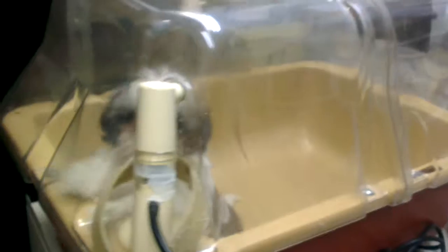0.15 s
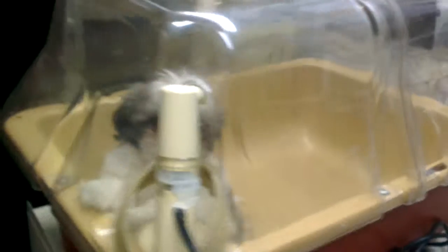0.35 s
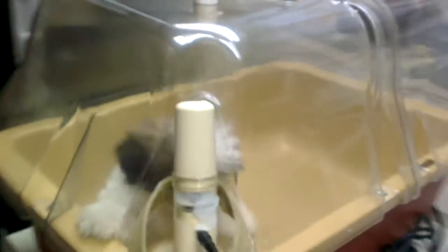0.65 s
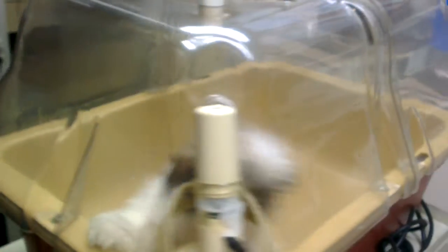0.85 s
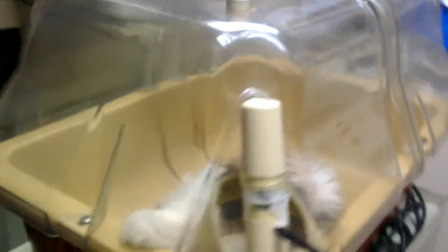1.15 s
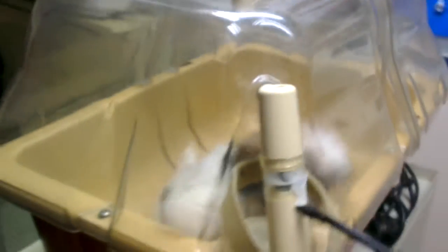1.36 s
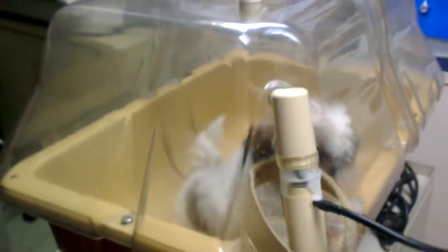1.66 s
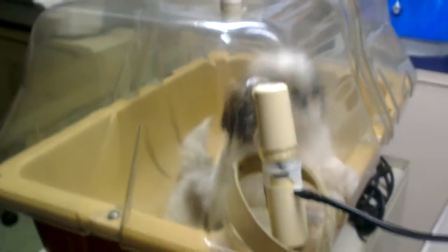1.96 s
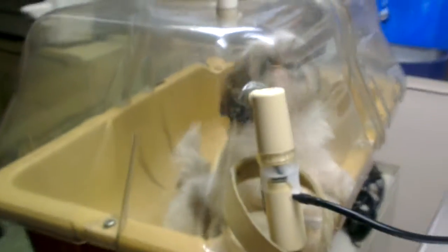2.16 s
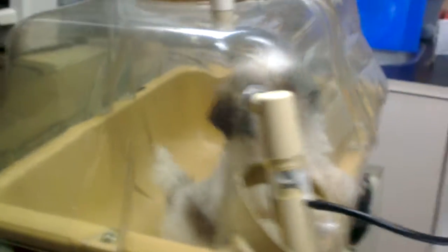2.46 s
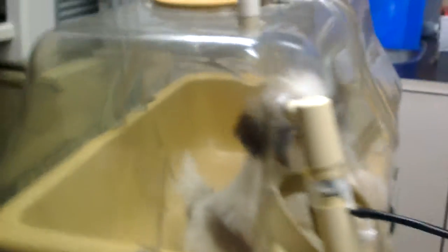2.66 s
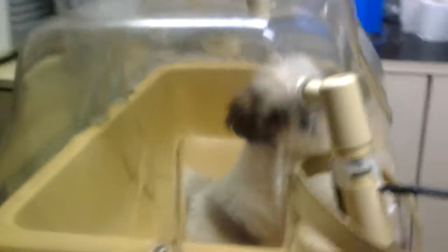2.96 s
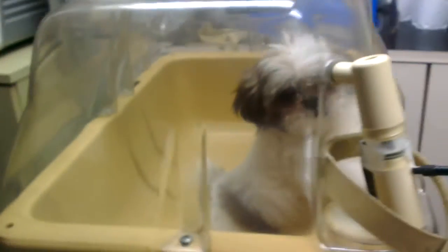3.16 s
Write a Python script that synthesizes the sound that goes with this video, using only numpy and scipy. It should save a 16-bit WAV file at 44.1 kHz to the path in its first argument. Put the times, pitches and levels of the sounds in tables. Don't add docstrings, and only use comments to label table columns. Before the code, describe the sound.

A compressor nebulizer hisses and hums steadily up close in a small room.

```python
import sys
import numpy as np
from scipy import signal
from scipy.fft import rfft, irfft
from scipy.io import wavfile
from scipy.ndimage import uniform_filter1d, map_coordinates

SR = 44100
rng = np.random.default_rng(int(sys.argv[2]) if len(sys.argv) > 2 else 0)


def put_to_file(sound):
    columns = np.atleast_2d(sound).T
    safe = np.clip(columns, -1, 1)
    whole_steps = np.round(safe * 32767)
    wavfile.write(sys.argv[1], SR, whole_steps.astype(np.int16))


def natural_amplitude(level_db):
    exponent = np.asarray(level_db, float) / 20
    return 10 ** exponent


N = 145089


def unit(x):
    return x / np.sqrt(np.mean(x ** 2) + 1e-20)


def along(points, hz):
    f, v = np.transpose(points)
    return np.interp(np.log(hz + 1), np.log(f + 1), v)


def curves(rows, t):
    s, *columns = np.transpose(rows)
    return [np.interp(t, s, column) for column in columns]


def wobble(rate):
    coarse = np.arange(0, N + 32, 32)
    knots = rng.standard_normal(2000)
    return np.interp(np.arange(N), coarse, map_coordinates(knots, [coarse * rate / SR]))


def peak(hz, centre_hz, width_hz):
    return 1 / (1 + (2 * (hz - centre_hz) / width_hz) ** 2)


def rush(gain, patchy_db, drive=1):
    # (frequency [Hz], correlation [0-1])
    alike = [(300, 0.5), (900, 0.31), (1700, 0), (3000, 0.26), (5000, 0.33), (8000, 0.98), (11000, 0.65),
             (15000, 0.5)]
    hz, t, z = signal.stft(drive * rng.standard_normal((2, N)), SR, nperseg=2048, noverlap=1536)
    hz = hz[:, None]
    patches = uniform_filter1d(rng.standard_normal(z.shape), 15, 1)
    patches = unit(uniform_filter1d(patches, 5, 2))
    spread = np.arccos(np.clip(along(alike, hz), -1, 1)) / 2
    mid = z[0] * np.cos(spread)
    side = z[1] * np.sin(spread)
    shaped = np.array([mid + side, mid - side]) * gain(hz, t) * natural_amplitude(patchy_db * patches)
    return unit(signal.istft(shaped, SR, nperseg=2048, noverlap=1536)[1][:, :N])


def room():
    # (frequency [Hz], level [dB per Hz])
    diffuse_tone = [(59, -75), (100, -48), (352, -10.5), (541, -16.5), (1160, -10.5), (1760, -19),
                    (2660, -12), (3840, -11.5), (4500, -11), (5850, -42), (9900, -120)]
    diffuse = rush(lambda hz, t: natural_amplitude(along(diffuse_tone, hz)), 1.7)
    tube = rush(lambda hz, t: peak(hz, 2626, 147), 2.1)
    tube_level = natural_amplitude(-51.5 + 0.3 * wobble(3.1))
    return natural_amplitude(-47) * diffuse * natural_amplitude([[.7], [-.7]]) + tube_level * tube * natural_amplitude([[1.4], [-1.4]])


def dog():
    # (time [s], pitch [Hz], level [dB])
    whimper_line = [
        (1.73, 805, -80),
        (1.76, 815, -58),
        (1.84, 855, -57),
        (1.865, 895, -62),
        (1.92, 905, -60),
        (1.96, 890, -67),
        (2.1, 900, -70),
    ]
    # (time [s], level [dB], length [s])
    scuff_marks = [
        (1.713, -46, 0.015),
        (1.759, -45.5, 0.044),
        (3.032, -59, 0.079),
    ]
    t = np.arange(N) / SR
    hz, level_db = curves(whimper_line, t)
    phase = 2 * np.pi * np.cumsum(hz * (1 + .01 * wobble(60))) / SR
    voice = np.sin(phase) + .15 * np.sin(2 * phase)
    whimper = natural_amplitude(level_db + 5 + 1.5 * wobble(35)) * voice * (t > 1.7) * (t < 2.1)
    shape = sum(natural_amplitude(db) * np.exp(-((t - s) / length) ** 2) for s, db, length in scuff_marks)
    rub = rush(lambda f, s: peak(f, 2160, 2000), 2.3, natural_amplitude(3.3 * wobble(300)))
    return whimper + shape * rub


def pump():
    # (multiple of stroke rate, level [dB])
    near_orders = [(1, -60), (2, -54), (3, -51), (4, -19), (5, -10.5), (6, -8), (7, -6), (8, 0.5),
                   (9, -11.5), (10, -1), (11, -8.5), (12, -23), (13, -17), (14, -18), (15, -15), (16, -17),
                   (17, -23), (18, -24.5), (19, -18.5), (20, -13), (21, -40), (22, -42), (23, -53),
                   (24, -36), (25, -16), (26, -22), (27, -15), (28, -16)]
    # (multiple of stroke rate, level [dB])
    far_orders = [(1, -62), (2, -64), (3, -30), (4, -16.5), (5, -22), (6, -17), (7, 0), (8, 0.5), (9, -8),
                  (10, -11.5), (11, -15), (12, -26), (13, -18), (14, -20.5), (15, -14.5), (16, -9),
                  (17, -20.5), (18, -10), (19, -12.5), (20, -12), (21, -25), (22, -57), (23, -64),
                  (24, -77), (25, -12.5), (26, -13), (27, -13.5), (28, -27)]
    # (multiple of stroke rate, level [dB])
    blades = [(41, -64.5), (43, -83.5)]
    # (time [s], level [dB], nearness [0-1])
    pump_walk = [
        (.08, -46, 0.95),
        (.5, -49.5, 0.97),
        (.9, -52, 0.85),
        (1.3, -52.5, 0.5),
        (1.6, -54, .05),
        (2.3, -55, 0),
        (3.29, -55, 0.45),
    ]
    # (frequency [Hz], level [dB per Hz])
    rattle_tone = [(59, -74), (100, -25), (207, -14), (356, -8), (464, 4), (548, -15), (900, -6),
                   (1170, -37), (1980, -120)]
    stroke_hz, unsteady_db = 45.3, 0.8
    t = np.arange(N) / SR
    level_db, near = curves(pump_walk, t)
    near = np.clip(near, 0, 1)
    stroke = 2 * np.pi * (stroke_hz * t + 0.0024 * wobble(3.08))
    hum = 0
    for (k, near_db), (_, far_db) in zip(near_orders, far_orders):
        phase = rng.uniform(0, 2 * np.pi) + np.array([[.15], [-.15]]) * wobble(1.75)
        order_db = near * near_db + (1 - near) * far_db + unsteady_db * k / 7 * wobble(8.93)
        hum = hum + natural_amplitude(order_db) * np.sin(k * stroke + phase)
    whine = sum(natural_amplitude(db - 0.5 + 0.83 * wobble(3.62)) * np.sin(k * stroke) for k, db in blades)
    rattle = rush(lambda hz, s: natural_amplitude(along(rattle_tone, hz)), 1.5, 1 + 0.73 * np.sin(stroke))
    case = hum + natural_amplitude(-10) * near * rattle
    return (natural_amplitude(level_db) * case + whine) * natural_amplitude([[.6], [-.6]])


def walls(hz, t):
    echo_db, echo_s, ears_s, drift_s = -7, .011, 0.000819, .00008
    delay = echo_s * rng.uniform(0.03026, 1, (6, 1, 1, 1))
    delay = delay + ears_s * rng.uniform(-0.493, 0.4996, (6, 2, 1, 1))
    knots = rng.standard_normal((12, 8))
    drift = np.array([np.interp(t, np.linspace(0, N / SR, 8), k) for k in knots]).reshape(6, 2, 1, -1)
    echoes = sum(np.exp(-2j * np.pi * hz * (d + drift_s * m)) for d, m in zip(delay, drift))
    return 1 + natural_amplitude(echo_db) * echoes


def jet():
    # (time [s], nearness [dB], aim of the beam [dB], bearing left over right [dB])
    path = [(0.09, -31, 2.5, -2.5), (0.16, -31.5, 7.5, -2.5), (0.6, -31, 8, -2.5), (0.91, -31.5, 11, -4),
            (0.93, -33, 11.5, -7.5), (1.26, -36.5, 17, -8.5), (1.64, -36.5, 11, -9.5),
            (2.31, -40.5, 8.5, -5.5), (2.55, -41, 9, -6.5), (2.67, -39, 4.5, -4.5), (2.81, -40.5, 1, -2),
            (3.02, -42, 4.5, -3), (3.12, -36.5, 1, -3.5), (3.16, -40, 2.5, -6), (3.24, -38, 5, -1.5),
            (3.29, -40, 10.5, 2)]
    # (centre [Hz], width [Hz], level [dB], lean left over right [dB], share of the beam [0-1])
    resonances = [(5167, 510, -7.5, -6.5, 0.06), (5810, 410, -18.5, -22.5, 0), (6730, 900, -21, -18, 0.06),
                  (7402, 362, 1, -7, 0.78), (7753, 430, -5.5, -16.5, 0.96), (8400, 1010, -8, 3, 0.07),
                  (8790, 370, -13, 8, 0.46), (10090, 600, -14.5, 5.5, 0), (11270, 310, -16, 10, 0),
                  (12350, 500, -26.5, -8, 0.5), (13020, 650, -16.5, 4, 0), (15500, 340, -21.5, 6, 0.9)]
    # (frequency [Hz], level [dB])
    broad = [(1500, -49.5), (3000, -32), (4300, -38.5), (6000, -15.5), (9500, -18), (14500, -22),
             (16000, -28)]
    # (time [s], change [dB], length [s])
    gulps = [
        (0.495, -0.5, 0.011),
        (1.559, -4.5, 0.023),
        (1.689, -5.5, 0.034),
        (1.757, 5, 0.011),
        (1.776, -4, 0.03),
        (1.942, -5.5, 0.013),
        (2.038, 1.5, .015),
        (2.137, -2.5, 0.012),
        (2.52, 3, .03),
        (2.682, -2, .025),
    ]
    side = np.array([.5, -.5])[:, None, None]

    def cup(hz, t):
        near_db, aim_db, bearing_db = [c - c.mean() for c in curves(path, t)]
        power = natural_amplitude(2 * along(broad, hz))
        for centre, width, db, lean_db, share in resonances:
            ring_db = db + share * aim_db + side * lean_db
            power = power + (peak(hz, centre, width) * natural_amplitude(ring_db)) ** 2
        return np.sqrt(power) * natural_amplitude(near_db + side * bearing_db) * walls(hz, t)

    t = np.arange(N) / SR
    gulp_db = sum(db * np.exp(-((t - s) / length) ** 2) for s, db, length in gulps)
    drive = natural_amplitude(gulp_db + 0.38 * wobble(16) + 0.55 * wobble(50))
    return natural_amplitude(15 + np.mean(np.transpose(path)[1])) * rush(cup, 1.5, drive)


def scene():
    return room() + dog() + pump() + jet()


def band_limit(x):
    return signal.sosfilt(signal.butter(12, 16200, fs=SR, output="sos"), x)


def record(dry):
    low_hz, top_hz, start_s = 140, 15750, .0775
    hz = np.fft.rfftfreq(N, 1 / SR)
    mic = (hz < top_hz) / (1 + (low_hz / (hz + 1)) ** 4)
    opening = np.clip((np.arange(N) / SR - start_s) / 0.0045, 0, 1)
    return band_limit(irfft(rfft(dry) * mic, N) * opening)


dry = scene()
out = record(dry)
put_to_file(out)
```